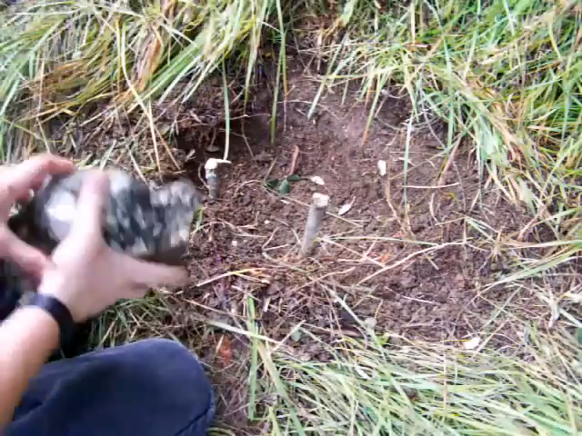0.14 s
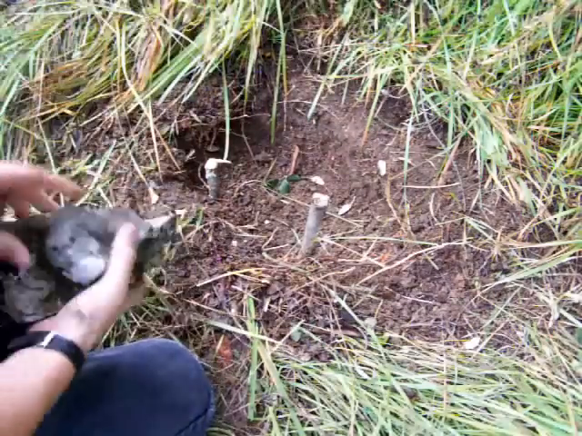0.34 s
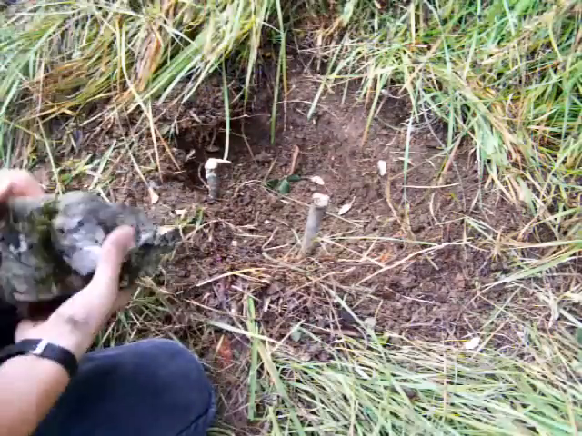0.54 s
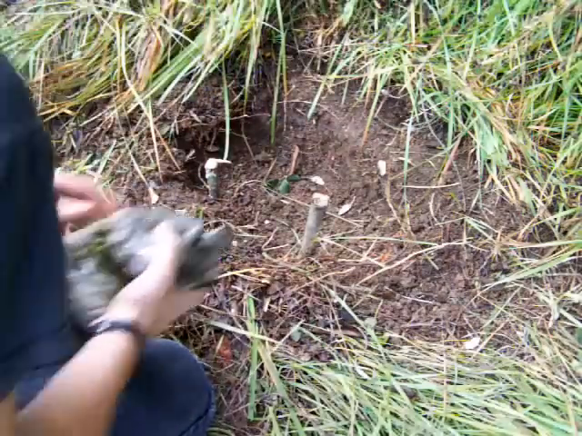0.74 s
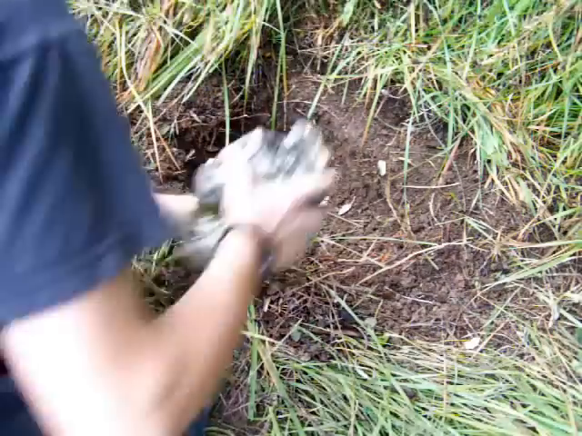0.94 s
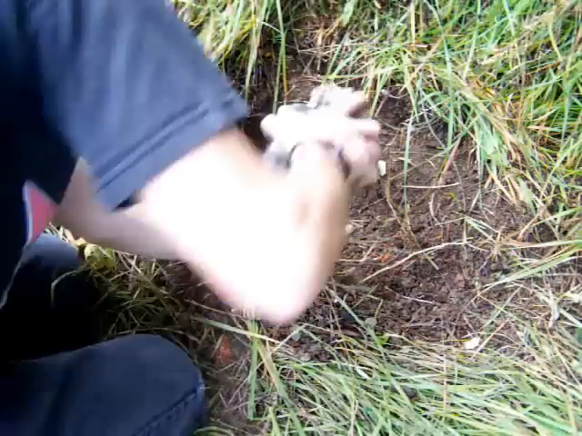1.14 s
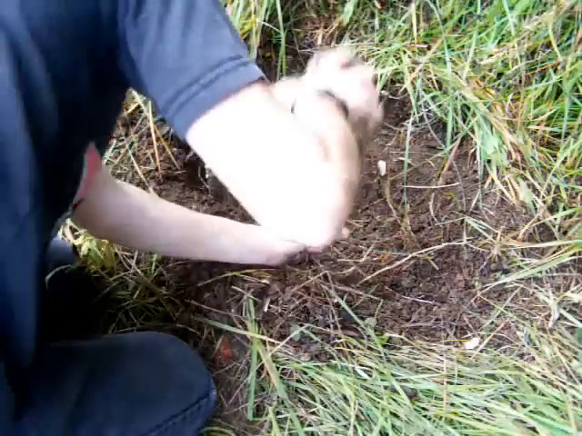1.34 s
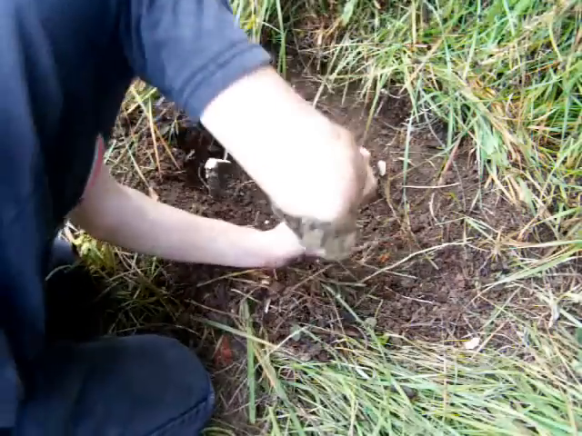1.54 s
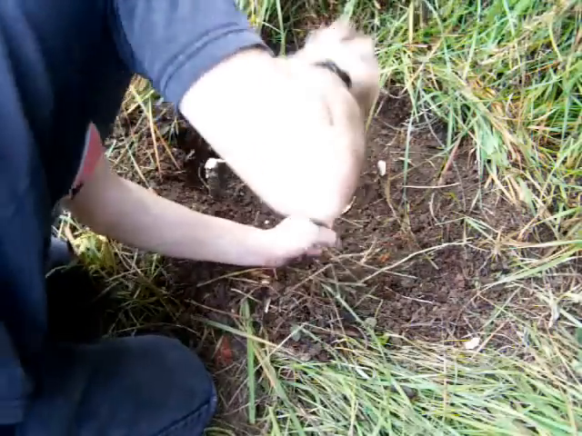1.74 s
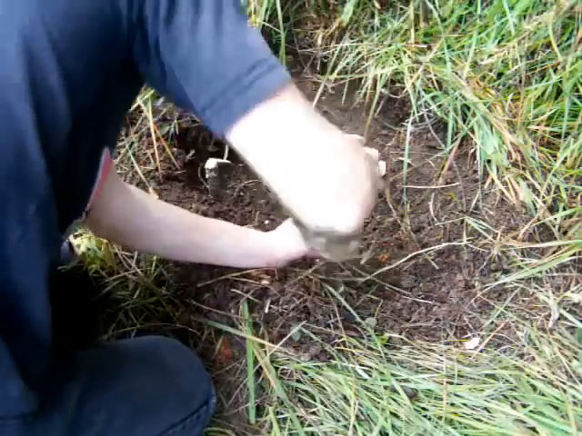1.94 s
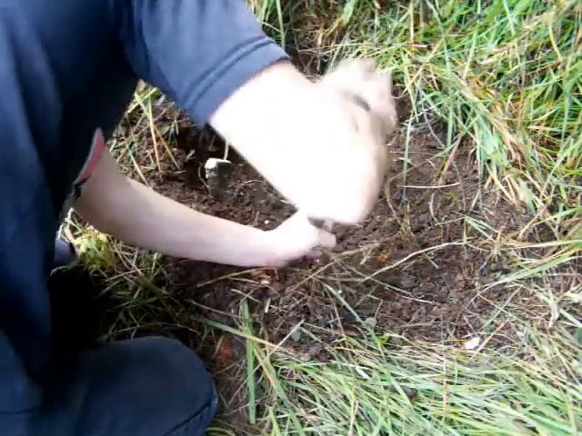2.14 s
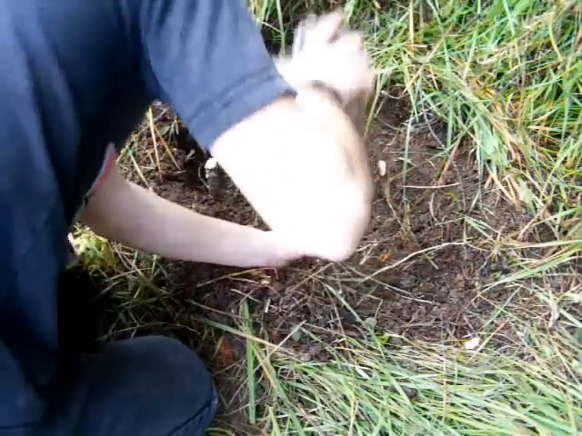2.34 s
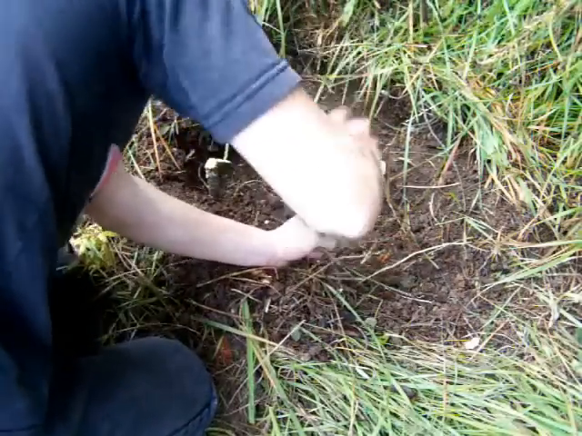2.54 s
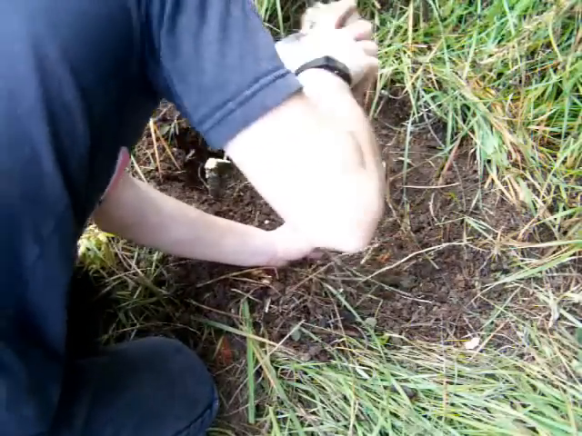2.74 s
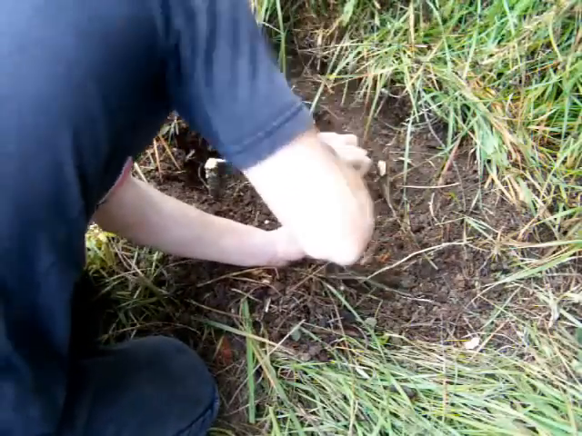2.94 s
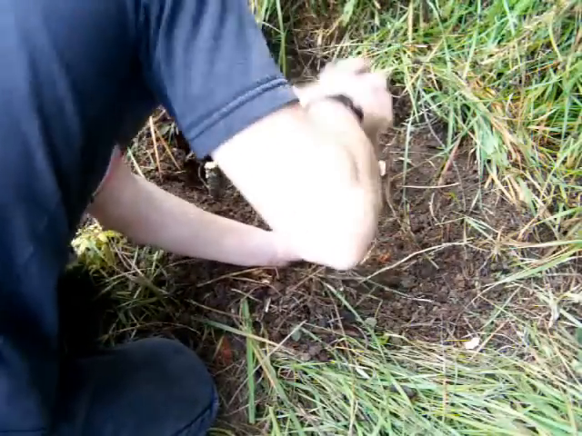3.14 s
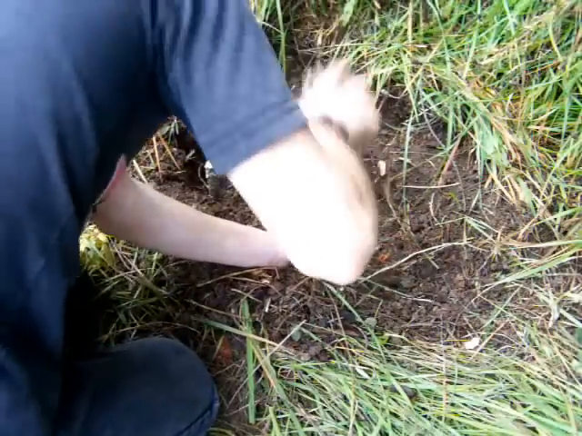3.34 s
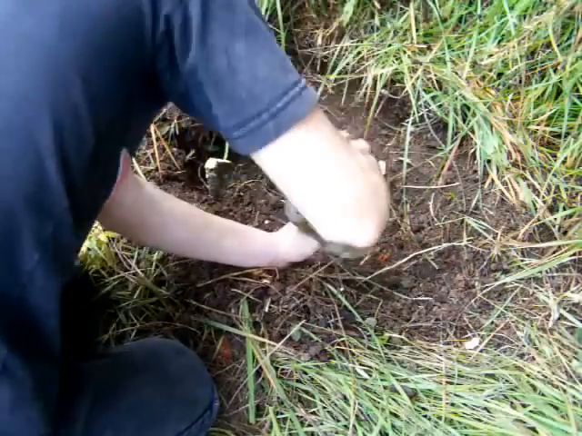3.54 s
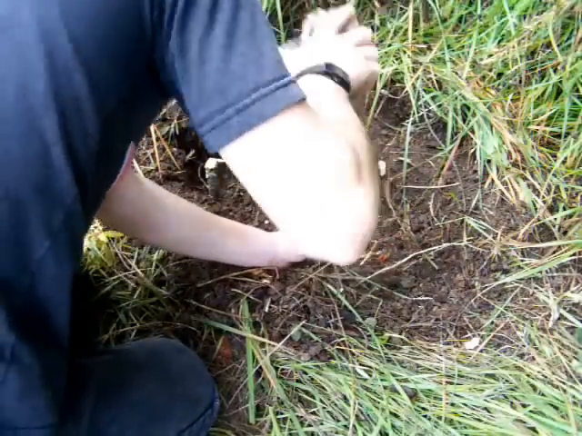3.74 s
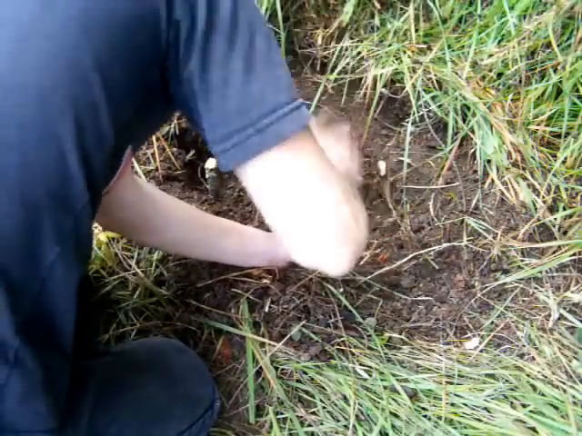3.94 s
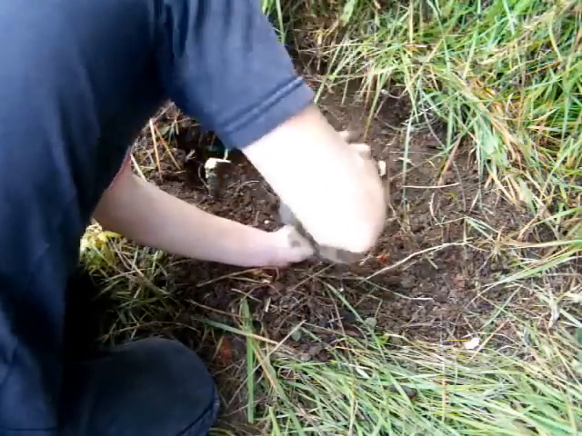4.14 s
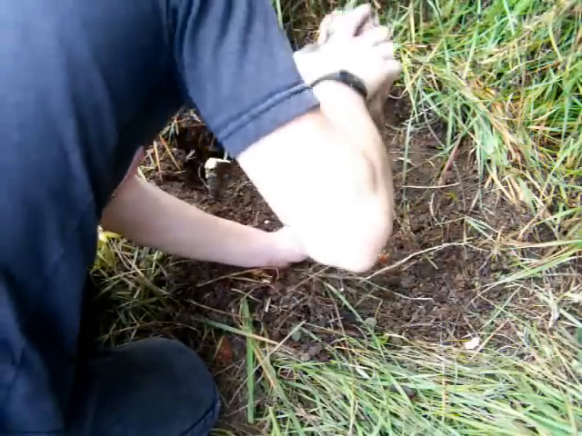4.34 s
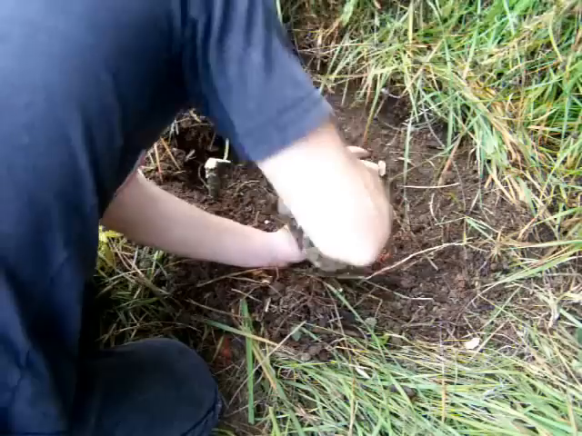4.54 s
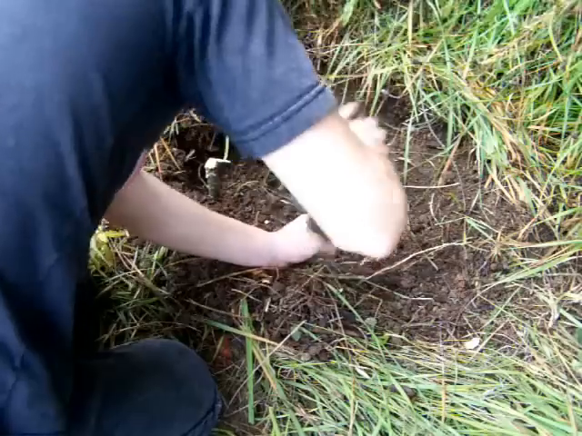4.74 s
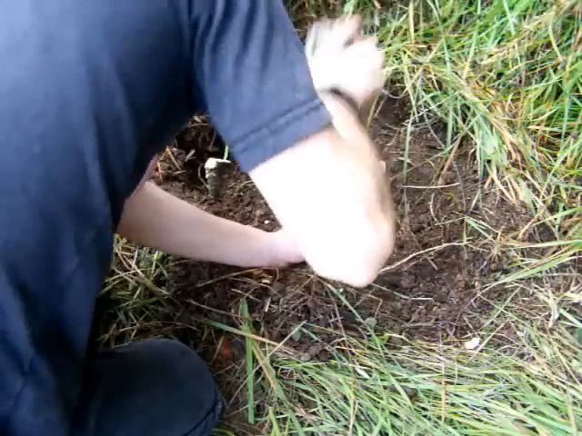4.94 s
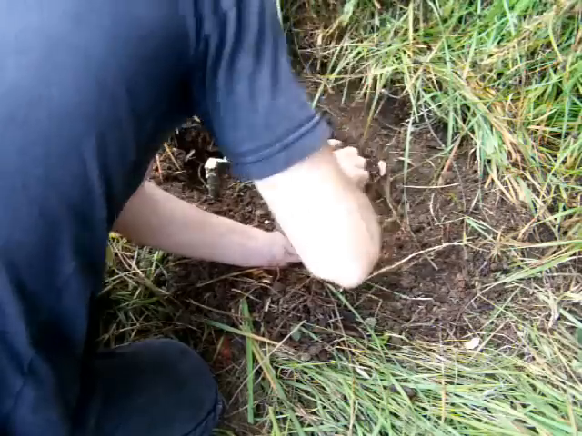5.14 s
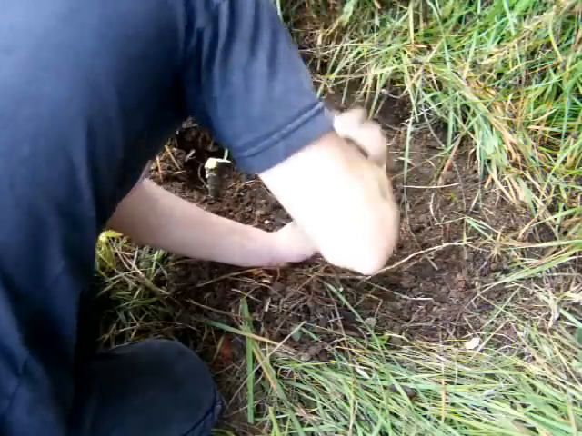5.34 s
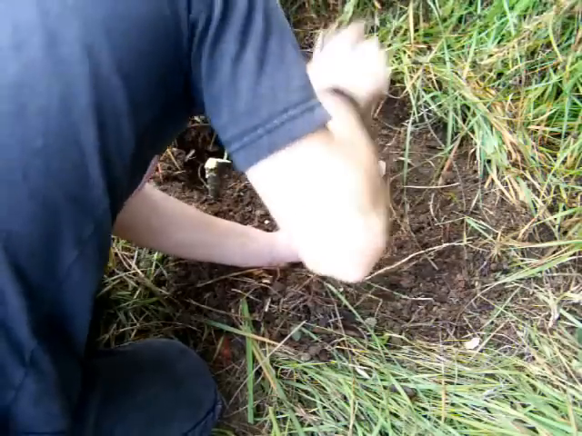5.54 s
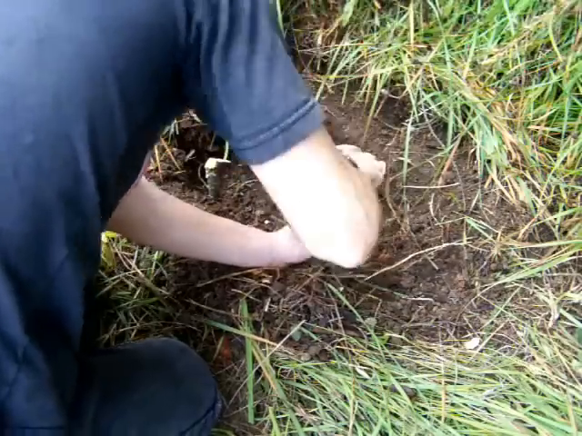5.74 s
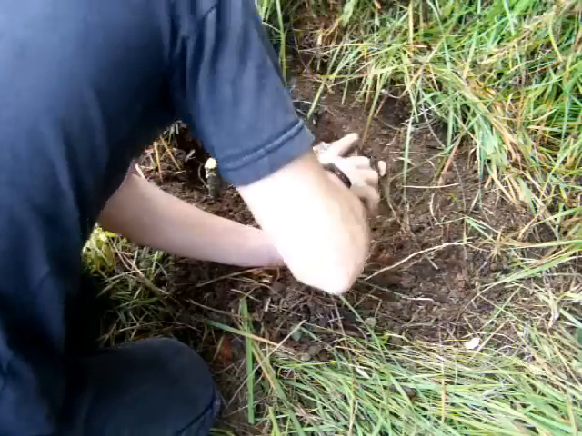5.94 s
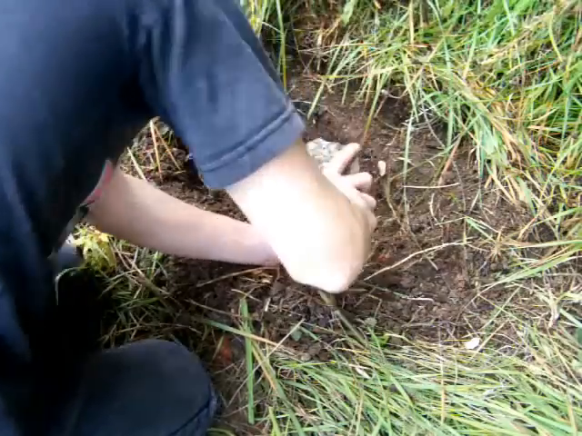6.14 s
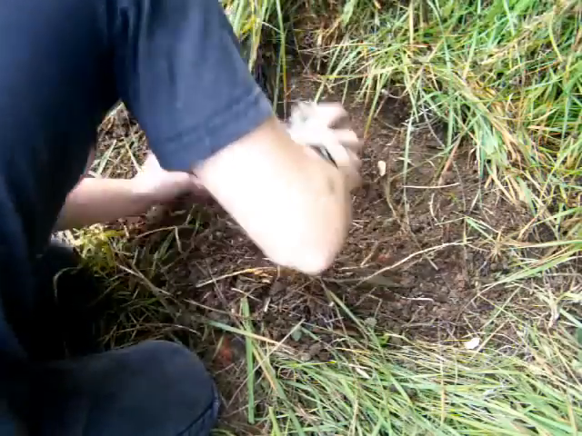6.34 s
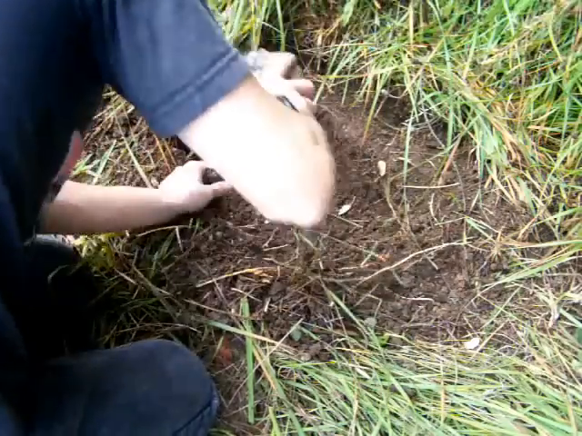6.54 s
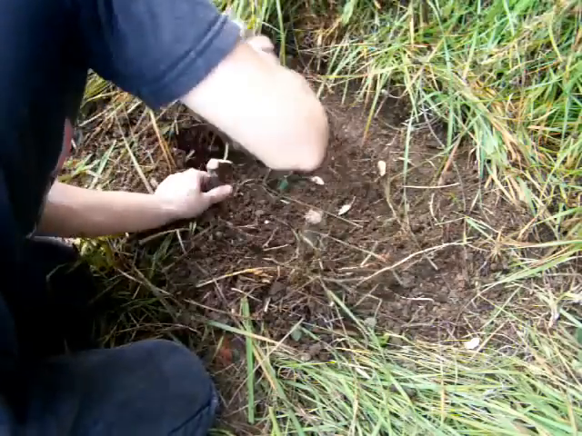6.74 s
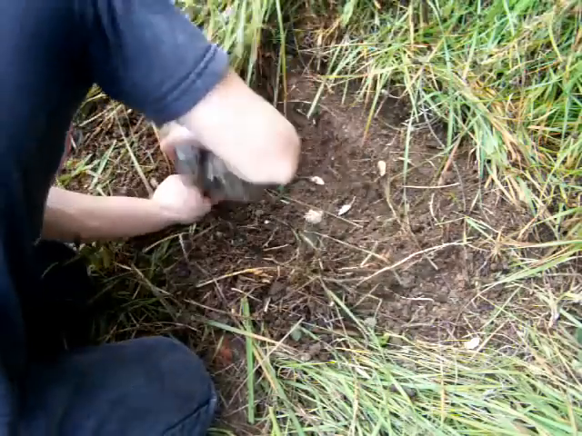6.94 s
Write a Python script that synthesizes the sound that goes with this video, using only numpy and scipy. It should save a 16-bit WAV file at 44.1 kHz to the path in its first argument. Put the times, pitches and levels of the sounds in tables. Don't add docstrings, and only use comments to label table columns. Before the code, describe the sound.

Outdoors in long grass, clothing rubs and stems crackle as someone leans in. Then a stone strikes a wooden stake about twice a second, each blow a sharp crack with a short woody knock, a low earthy thump and a little shaken grit. Sleeve and grass swish between blows. After a rustling pause one last hit lands. A small close microphone flattens the peaks, over a faint low outdoor rumble.

```python
import sys
import numpy as np
from scipy import signal
from scipy.io import wavfile

SR = 44100
rng = np.random.default_rng(int(sys.argv[2]) if len(sys.argv) > 2 else 0)


def boost(x):
    u = np.asarray(x, float) / 20
    return 10 ** u


def to_wav(s):
    ch = np.atleast_2d(s).T
    pcm = np.round(np.clip(ch, -1, 1) * 32767)
    wavfile.write(sys.argv[1], SR, pcm.astype(np.int16))


N = 308259

# f/Hz, level/dB per Hz
AIR_SPECTRUM = [(12, -37), (20, -6), (49, 0.5), (79, 2.5), (214, -8.5), (405, -9.5), (1070, -18.5),
                (1970, -19), (2880, -22.5), (3910, -22), (5590, -26), (7590, -32.5), (8840, -45),
                (11500, -75), (19400, -120)]
AIR_LEVEL_DB = -54
# t/s, f/Hz, level/dB
DOVE_NOTE = [
    (5.8, 637.5, -75),
    (5.816, 613.6, -61),
    (5.862, 640.6, -61),
    (5.916, 641.6, -59),
    (6.004, 608.3, -60),
    (6.02, 628.0, -85),
]

# f/Hz, level/dB per Hz
GRASS_SPECTRUM = [(1180, -44.5), (2000, -4), (2180, -14.5), (3370, -2.5), (3770, -4.5), (4900, 1.5),
                  (5480, 2), (6400, -7), (7570, -10.5), (8360, -19), (8840, -29), (11500, -59),
                  (19400, -120)]
# f/Hz, level/dB per Hz
CLOTH_SPECTRUM = [(150, -43), (250, 1.5), (297, -4.5), (551, 0.5), (646, -6), (719, -4), (1040, -4),
                  (1170, -7), (1760, 0.5), (3200, -11), (4160, -23.5), (7040, -120)]
# f/Hz, width/Hz, level/dB
RUSTLE_RESONANCES = [
    (1975, 580, -6.5),
    (3750, 540, -0.5),
    (5510, 460, -3),
    (7260, 270, 3),
]
# t/s, grass level/dB, cloth level against grass/dB
LEANING = [(0, -43.5, 4), (.13, -52, 3.5), (.19, -47, -1.5), (.3, -55, -1), (.33, -49, -10),
           (.42, -57.5, -3), (.44, -53.5, -5), (.54, -61.5, 6.5), (.62, -60.5, -7), (.78, -57, 0.5),
           (.82, -49.5, 4), (.88, -47.5, -6.5), (.94, -39, -4), (.99, -44, -10), (1.1, -48.5, -8),
           (1.13, -53, -1.5), (1.35, -53.5, -11), (1.42, -42.5, -21)]
# t of the peak/s, grass level/dB, rise/s per 20 dB, fall/s per 20 dB
ARM_SWISHES = [(1.632, -51, 0.18, 0.18), (1.71, -42, .01, -0.15), (1.75, -61.5, .05, 0.5),
               (2.126, -47, 0.043, .04), (2.246, -64, .08, 1.5), (2.424, -47.5, 0.059, 0),
               (2.596, -63.5, 0.056, 1.5), (3.114, -58, 0.016, .12), (3.2, -65, .1, 0.1),
               (3.636, -51, 0.011, 0.12), (4.226, -56.5, .15, -0.1), (4.36, -64.5, 0.19, 0.8),
               (4.684, -50, 0.03, 0), (4.748, -55, 0.042, 0.1), (4.868, -59, 0.09, -0.1),
               (5.15, -54.5, 0.04, 0.48), (5.364, -50, 0.057, -0.25), (5.474, -50, 0.019, -0.48),
               (5.7, -58, 0.027, -4), (5.85, -55.5, 0.052, 0.2), (5.99, -50, 0.26, -0.02),
               (6.045, -43.5, .05, 0.22), (6.13, -42.5, .2, 0.11), (6.324, -46, 0.0058, 0.08),
               (6.355, -45.5, 0.018, 0.1), (6.565, -47, 0.016, .07), (6.75, -62, .5, 3),
               (6.868, -49, 0.0059, 0.2), (6.889, -44.5, 0.011, 0.1)]
SWISH_CLOTH_DB, STILL_DB = -11.5, -69.5
SHAKE_DB, SLEEVE_DB = -39.5, -4.5
SHAKE_LAG_S, GRASS_FALL_S, SLEEVE_FALL_S = 0.016, 0.12, 0.13
BRUSH_LUMPS_DB, DEBRIS_LUMPS_DB = 1.5, 4.0

# t/s, peak level/dB, f/Hz
SNAP_EVENTS = [(0.1796, -32, 4690), (0.4329, -40, 3790), (0.6483, -38.5, 4200), (0.6781, -39.5, 3830),
               (0.6984, -38, 7150), (0.7095, -36, 5250), (0.7204, -44, 5260), (0.8044, -38, 3630),
               (0.8111, -17, 4620), (0.8628, -29, 4960), (0.882, -33, 5730), (0.8879, -23, 3900),
               (0.909, -34, 5510), (0.9344, -19, 5500), (0.9534, -33, 5670), (0.9701, -22, 5200),
               (1.0096, -31.5, 4420), (1.0694, -34, 5090), (1.1048, -30, 5000), (1.1293, -43, 3670),
               (1.2246, -38, 3750),
               (1.4691, -30.5, 4400), (1.6342, -30.5, 5230), (1.709, -35, 5570), (2.0986, -36, 5540),
                  (2.1206, -31, 5110), (2.1545, -36.5, 2700), (2.5925, -38, 5340), (2.8657, -30, 4200),
                  (3.1143, -38.5, 3580), (3.3764, -39, 5490), (3.4161, -49, 4170), (3.6386, -34.5, 5560),
                  (3.678, -46, 3660), (3.9264, -33, 4550), (4.2228, -42.5, 5030), (4.3515, -39, 5350),
                  (4.4887, -49, 5500), (4.6818, -37, 3300), (4.7416, -40.5, 5140), (5.3602, -37.5, 4340),
                  (5.4725, -44, 4920), (5.6311, -40, 5580), (5.693, -41, 4100), (5.9574, -28, 5000),
                  (6.0412, -34, 4330), (6.1325, -29, 4850), (6.1684, -33, 5240), (6.324, -44, 5200),
                  (6.5605, -39.5, 5810), (6.8678, -32.5, 5390)]
SNAP_LOW_DB = -11
# t/s, rms level/dB, f/Hz, length/s
STAKE_SCRAPES = [
    (0.176, -46, 5360, .015),
    (2.417, -40.5, 3600, .007),
    (2.907, -46, 4000, 0.0086),
    (6.345, -42, 4900, 0.032),
    (6.883, -40, 5500, .01),
]
SCRAPE_WIDTH = 0.13

# t/s, knock level/dB, ground level/dB, sway level/dB, knock f/Hz
STAKE_BLOWS = [(1.3786, -9.5, -27, -20, 242), (1.8442, -6.5, -28, -19, 295), (2.327, -8, -29.5, -23, 364),
               (2.8186, -6, -25, -17.5, 271), (3.3348, -4.5, -24.5, -19, 288),
               (3.8962, -5.5, -22.5, -14.5, 256), (4.436, -6, -24.5, -20, 330),
               (5.0043, -6.5, -25, -15, 214), (5.0625, -55, -37.5, -46, 180), (5.5982, -6.5, -24, -15, 323),
               (5.6728, -20, -30.5, -35.5, 232), (6.9072, -9.5, -32.5, -20.5, 310)]
# t/s, dull level/dB, dull f/Hz, bright level/dB, bright f/Hz
STONE_CRACKS = [(1.3742, -38.5, 1790, -31, 4320), (1.842, -23.5, 1870, -19, 3720),
                (2.3239, -26, 1520, -20, 4810), (2.817, -21, 1760, -17.5, 3620),
                (3.3326, -20.5, 1650, -21.5, 3790), (3.894, -25, 1610, -21.5, 4600),
                (4.434, -20.5, 1360, -21, 4840), (5.003, -22, 1410, -19, 4080),
                (5.07, -62, 1390, -59, 4880), (5.597, -14.5, 1480, -23.5, 3330),
                (5.671, -43, 1080, -56, 4710), (6.9051, -25, 1550, -22, 4150)]
# f/Hz, width/Hz, level/dB
CRACK_RINGS = [
    (1150, 170, -4.5),
    (2550, 760, -0.5),
    (3550, 260, -1.5),
    (5480, 700, -3),
]
CRACK_TOP_HZ, STRIKE_SPREAD_DB = 6600, -3
CRUSH_S, CHATTER_S = 0.003, 0.016
SLAP_LEAD_S, SLAP_CYCLES = 0.00105, 2.5
GRIT_DB = -20
SETTLE_S, SETTLE_WIDTH_S, SETTLE_DB = 0.016, 0.0025, -7

# f/Hz, level/dB, time to fall 60 dB/s
GROUND_TONES = [
    (71.1, 31.0, .058),
    (73.7, 29.0, .070),
]
SWAY, RECOIL = (144, 0.093), (196.5, 0.063)
PUSH_LEAD_S, RECOIL_LAG_S = 0.0032, 0.00504
KNOCK_CYCLES, KNOCK_LEAD_CYCLES = 2.23, 0.17
SOFTNESS = 0.39
OVERLOAD = 0.62


def rms_one(x):
    return x / np.sqrt(np.mean(x ** 2) + 1e-20)


def in_time(rows):
    s, *columns = np.transpose(rows)
    return [np.interp(np.arange(N) / SR, s, column) for column in columns]


def low_pass(x, hz, order=2):
    return signal.sosfilt(signal.butter(order, hz, fs=SR, output="sos"), x)


def band(x, low_hz, high_hz):
    sos = signal.butter(2, [low_hz, min(high_hz, SR / 2.2)], "band", fs=SR, output="sos")
    return signal.sosfilt(sos, x)


def resonance(x, hz, width_hz, db):
    return boost(db) * signal.lfilter(*signal.iirpeak(hz, hz / width_hz, fs=SR), x)


def clicks(times, db):
    out = np.full(N, 1e-18)
    out[np.round(np.asarray(times) * SR).astype(int)] = boost(db)
    return out


def ring(x, hz, t60):
    r = boost(-60 / (t60 * SR))
    w = 2 * np.pi * hz / SR
    return signal.lfilter([0, np.sin(w)], [1, -2 * r * np.cos(w), r * r], x)


def drift(rate):
    r = np.exp(-80 * np.pi * rate / SR)
    slow = signal.lfilter([1], [1, -2 * r, r * r], rng.standard_normal(N // 40 + 2002))[2000:]
    return np.interp(np.arange(N) / 40, np.arange(len(slow)), rms_one(slow))


def grains(per_s, spread_db, hiss):
    sizes = boost(spread_db * np.minimum(rng.exponential(1, N), 4)) * rng.choice([-1, 1], N)
    hits = rms_one(sizes * (rng.random(N) < per_s / SR))
    return rms_one(hits + hiss * rng.standard_normal(N))


def coloured(sources, spectrum, patchy_db, rate):
    hz, db = np.transpose(spectrum)
    edges = 20 * 2 ** np.arange(0, 9, 1 / 3)
    out = 0
    together = drift(rate)
    for k, (low, high) in enumerate(zip(edges, edges[1:])):
        if hz[0] < high and low < hz[-1]:
            level_db = np.interp(np.log(low * high) / 2, np.log(hz), db)
            flicker_db = patchy_db * (together + 0.81 * drift(rate))
            out = out + boost(level_db + flicker_db) * band(sources[k % 2], low, high)
    return rms_one(out)


def swells(rows):
    t = np.arange(0, N + 32, 32) / SR
    power = 0
    for s, db, rise, fall in rows:
        away = np.where(t < s, (s - t) / max(rise, 0.002), (t - s) / max(fall, 0.002))
        power = power + boost(2 * (db - 20 * away))
    return np.interp(np.arange(N) / SR, t, power)


def open_air():
    noise = rng.standard_normal((2, N))
    return boost(AIR_LEVEL_DB) * coloured(noise, AIR_SPECTRUM, patchy_db=0.45, rate=6)


def dove():
    hz, db = in_time(DOVE_NOTE)
    t = np.arange(N) / SR
    sounding = (t > DOVE_NOTE[0][0]) * (t < DOVE_NOTE[-1][0])
    return boost(db + 1 + 0.6 * drift(30)) * sounding * np.sin(2 * np.pi * np.cumsum(hz) / SR)


def rustle():
    lean_db, share_db = in_time(LEANING)
    leaning = boost(2 * lean_db) * (np.arange(N) < LEANING[-1][0] * SR)
    brushing = swells(ARM_SWISHES) + boost(2 * STILL_DB)
    shakes = [(s + SHAKE_LAG_S, db + SHAKE_DB) for s, db, *_ in STAKE_BLOWS]
    shaken = swells([(s, db, 0.01, GRASS_FALL_S) for s, db in shakes])
    sleeve = swells([(s, db + SLEEVE_DB, 0.01, SLEEVE_FALL_S) for s, db in shakes])

    brush_lumps = boost(2 * BRUSH_LUMPS_DB * drift(45))
    debris_lumps = boost(2 * DEBRIS_LUMPS_DB * drift(35))
    grass_gain = np.sqrt((leaning + brushing) * brush_lumps + shaken * debris_lumps)
    cloth_gain = np.sqrt(leaning * boost(2 * share_db) + brushing * boost(2 * SWISH_CLOTH_DB) + sleeve)

    clumps = boost(1.5 * drift(70))
    blades = [grains(per_s=1500.0, spread_db=4.5, hiss=0.8) * clumps for _ in range(2)]
    grass = coloured(blades, GRASS_SPECTRUM, patchy_db=-0.56, rate=12)
    cloth = coloured(rng.standard_normal((2, N)), CLOTH_SPECTRUM, patchy_db=0.6, rate=25)
    out = boost(-3.5) * grass_gain * grass + boost(-3.0) * cloth_gain * cloth
    for hz, width_hz, db in RUSTLE_RESONANCES:
        out = out + resonance(out, hz, width_hz, db)
    return out


def snaps():
    t = np.arange(400) / SR
    events = SNAP_EVENTS
    out = np.zeros(N + len(t))
    for s, db, hz in events:
        burst = (rng.standard_normal(len(t)) + 4.47 * (t == 0)) * boost(-60 * t / 0.0073)
        snap = band(burst, hz * 0.5, hz * 1.42) + boost(SNAP_LOW_DB) * band(burst, 930, 2200)
        out[round(s * SR):][:len(t)] += boost(db + 1) * snap / np.abs(snap).max()
    return out[:N]


def scrapes():
    t = np.arange(3000) / SR
    out = np.zeros(N)
    rub = grains(per_s=4000.0, spread_db=6.5, hiss=0.7)
    for s, db, hz, length in STAKE_SCRAPES:
        at = slice(round(s * SR), round(s * SR) + len(t))
        shape = np.minimum(t / 0.0015, 1) * np.exp(-(t / length) ** 3)
        narrow = band(rub[at], hz / (1 + SCRAPE_WIDTH), hz * (1 + SCRAPE_WIDTH))
        out[at] += boost(db) * shape * rms_one(narrow)
    return out


def with_rings(x, strengths_db):
    out = low_pass(x, CRACK_TOP_HZ)
    for (hz, width_hz, db), more_db in zip(CRACK_RINGS, strengths_db):
        out = out + resonance(x, hz, width_hz, db + more_db)
    return out


def cracks():
    t = np.arange(1600) / SR
    first_spray = np.minimum(t / 0.0032, 1) * np.exp(-(t / CHATTER_S) ** 3)
    second_spray = boost(SETTLE_DB) * np.exp(-((t - SETTLE_S) / SETTLE_WIDTH_S) ** 2)
    shaking = first_spray + second_spray
    crush = grains(per_s=8000.0, spread_db=1.5, hiss=1.0)
    grit = grains(per_s=2500.0, spread_db=3.5, hiss=0.5) * boost(2.5 * drift(120))
    out = np.zeros(N)
    strikes_db = STRIKE_SPREAD_DB * rng.standard_normal((len(STAKE_BLOWS), len(CRACK_RINGS)))
    for blow, crack, strike_db in zip(STAKE_BLOWS, STONE_CRACKS, strikes_db):
        blow_s, _, _, sway_db, _ = blow
        s, dull_db, dull_hz, bright_db, bright_hz = crack
        at = slice(round(s * SR), round(s * SR) + len(t))
        full = max(blow_s - SLAP_LEAD_S - s, 0.0003)
        crushing = crush[at] * np.where(t < full, boost(-5.5), np.exp(-(t - full) / CRUSH_S))
        dull = rms_one(band(crushing, dull_hz * 0.58, dull_hz * 2.07))
        bright = rms_one(band(crushing, bright_hz * 0.68, bright_hz * 1.283))
        chatter = rms_one(band(grit[at] * shaking, 850, 6200))
        out[at] += with_rings(boost(dull_db - 16.0) * dull + boost(bright_db - 10.0) * bright, strike_db)
        out[at] += boost(sway_db + GRIT_DB) * chatter

        dull_fall_db, bright_fall_db = 60 * t * dull_hz / SLAP_CYCLES, 30 * t * bright_hz / SLAP_CYCLES
        slap = np.sin(2 * np.pi * dull_hz * t) * boost(dull_db + 22.0 - dull_fall_db)
        slap += np.sin(2 * np.pi * bright_hz * t) * boost(bright_db - 6.0 - bright_fall_db)
        out[round((blow_s - SLAP_LEAD_S) * SR):][:len(t)] -= slap
    return out


def thumps():
    s, _, ground_db, sway_db, _ = np.transpose(STAKE_BLOWS)
    (hz1, db1, fall1), (hz2, db2, fall2) = GROUND_TONES
    push = clicks(s - PUSH_LEAD_S, ground_db)
    out = boost(db2) * ring(push, hz2, fall2) - boost(db1) * ring(push, hz1, fall1)
    out += ring(clicks(s - PUSH_LEAD_S, sway_db), *SWAY)
    out -= ring(clicks(s + RECOIL_LAG_S, sway_db), *RECOIL)
    out = low_pass(out, 700)
    t = np.arange(800) / SR
    for (at, db, _, _, hz), crack in zip(STAKE_BLOWS, STONE_CRACKS):
        knock = np.sin(2 * np.pi * hz * t) * boost(db + 10.5 - 60 * t * hz / KNOCK_CYCLES)
        top_hz = 2.7 * hz * boost(SOFTNESS * np.clip(crack[1] - db + 18, -12, 5))
        start = at - KNOCK_LEAD_CYCLES / hz - 0.4 / top_hz
        out[round(start * SR):][:len(t)] += low_pass(knock, top_hz, order=4)
    return out


def scene():
    background = open_air() + dove()
    handling = rustle() + snaps() + scrapes()
    blows = cracks() + thumps()
    return (background + handling + blows)[None]


def roll_off(x):
    return signal.sosfilt(signal.butter(12, 8990, fs=SR, output="sos"), x)


def record(dry):
    x = signal.sosfilt(signal.butter(2, 35, "high", fs=SR, output="sos"), dry)
    treble_cut = signal.cheby2(12, 45, 9120, fs=SR, output="sos")
    x = signal.sosfilt(treble_cut, x)
    x = x / (1 + (np.abs(x) / OVERLOAD) ** 8) ** (1 / 8)
    mix = signal.sosfilt(treble_cut, x)
    return roll_off(mix)


dry = scene()
out = record(dry)
to_wav(out)
```